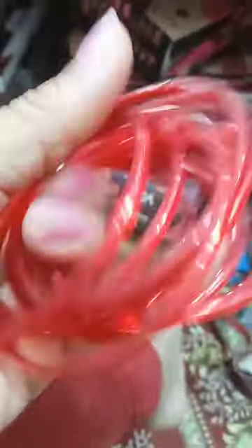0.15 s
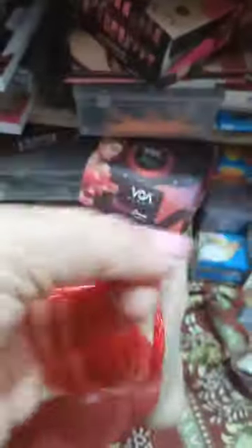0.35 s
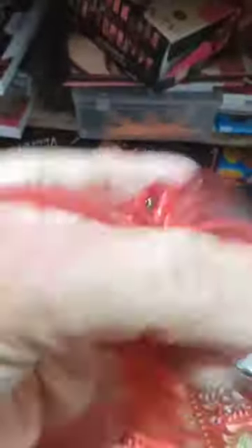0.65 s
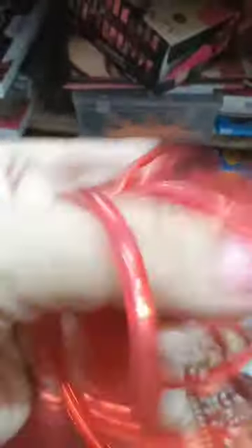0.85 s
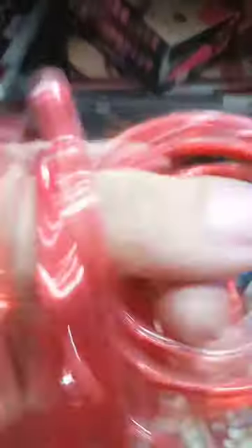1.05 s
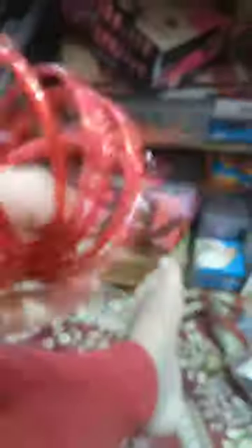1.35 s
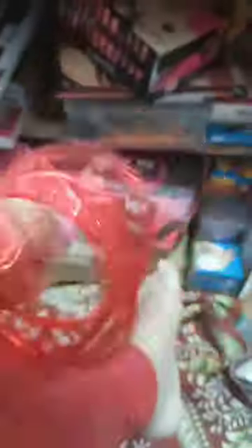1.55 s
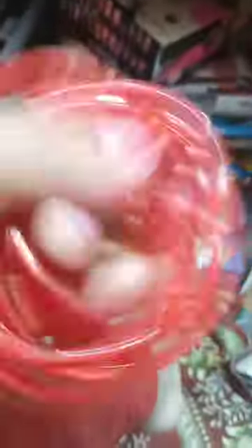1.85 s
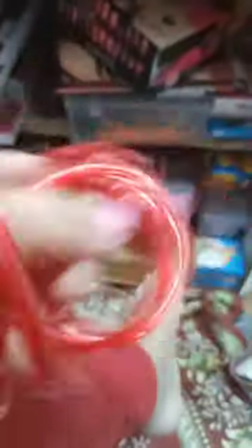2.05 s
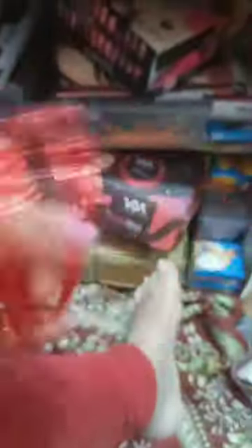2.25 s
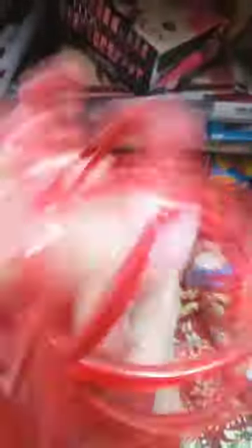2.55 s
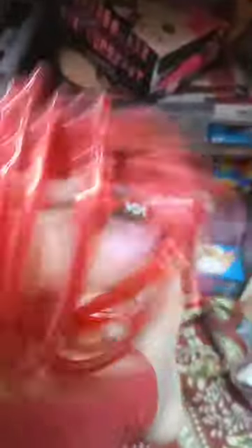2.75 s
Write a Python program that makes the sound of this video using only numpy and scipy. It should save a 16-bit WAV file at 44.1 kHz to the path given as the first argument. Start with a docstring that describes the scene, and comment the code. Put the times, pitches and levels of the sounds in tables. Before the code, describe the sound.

Glass bangles clink and jingle as a hand shakes them close by.

```python
"""A small room: a hand shakes a bunch of thin glass bangles, close by.
One bangle clinks alone, then the bunch slides and clashes in quick runs of tiny contacts.
Each contact ticks and rings a bangle's bending modes; now and then one swings free and sings.
The moving hand makes soft low thumps; behind it the room rumbles and hums faintly."""
import sys
import numpy as np
from scipy import signal
from scipy.fft import rfft, irfft
from scipy.io import wavfile
from scipy.ndimage import uniform_filter1d

SR = 44100
rng = np.random.default_rng(int(sys.argv[2]) if len(sys.argv) > 2 else 0)


def generate_wav(sig):
    """Save sig (samples, or channels by samples) to the path in sys.argv[1] as 16-bit PCM at SR."""
    pcm = np.round(np.clip(np.atleast_2d(sig).T, -1, 1) * 32767).astype(np.int16)
    wavfile.write(sys.argv[1], SR, pcm)


N = 127890
TIME_S = np.arange(N) / SR

# room rumble: f/Hz, relative density/dB
RUMBLE_SPECTRUM = [(25, -56), (70, -6), (150, -20), (220, -1), (350, -3), (510, 0), (690, -17), (900, -13),
                   (1200, -8.5), (1700, -10.5), (2500, -19.5), (3600, -24.5), (6500, -28.5), (9000, -51.5),
                   (15000, -79)]
# low-mid swells of the rumble: f/Hz, relative density/dB
SWELL_SPECTRUM = [(130, -23.5), (220, -5), (330, -1), (520, -3.5), (680, -17), (1500, -40)]
# trend of the swells: t/s, level/dB
SWELL_TREND = [(0, -56.5), (1.55, -55.5), (2.1, -51), (2.4, -58.5), (2.6, -52), (2.9, -55)]
# hand thumps: centre t/s, level/dB, half-width/s
HAND_THUMPS = [(0.09, -48.5, 0.04), (0.191, -41, 0.022), (0.264, -44.5, 0.038), (0.492, -43, 0.042),
               (0.564, -45.5, 0.023), (0.783, -45, 0.05), (1.109, -40, 0.022), (1.296, -48, 0.018),
               (1.734, -53, 0.022), (2.35, -58.5, 0.023)]
# grip rumble until the hand settles: t/s, level/dB
GRIP_LEVEL = [(0, -79), (.7, -58.5), (1.5, -62.5), (2.2, -66.5), (2.5, -89)]
# thumps and grip: f/Hz, relative density/dB
HAND_SPECTRUM = [(25, -31), (55, -6.5), (115, 1), (190, -6.5), (300, -11.5), (700, -68)]
# dull knocks of glass on skin: t/s, level/dB
SKIN_KNOCKS = [(0.4186, -38), (1.287, -48), (1.724, -48.5)]
# glass on skin: f/Hz, relative density/dB
SKIN_SPECTRUM = [(80, -27), (400, 8), (800, -3.5), (2000, -11.5), (4000, -12), (9000, -24)]
# lone clink, modes: f/Hz, relative level/dB, T60/s
LONE_MODES = [(1631, -15, .6), (4167, -14, .2), (4581, 1, .31), (5950, -4, .09), (6562, -10, .1),
              (8050, -7, .15), (8710, 0, .18), (12990, -2, .12)]
# lone clink, tick: f/Hz, relative density/dB
LONE_TICK_SPECTRUM = [(500, -11), (2000, -12), (2600, -2), (3500, -4.5), (5000, -1), (15000, -9.5)]
# partials of free-swinging bangles: t/s, f/Hz, level/dB
FREE_PARTIALS = [(0.571, 9700, -59.5), (.788, 8160, -40), (0.794, 5720, -43), (.883, 8040, -50.5),
                 (.977, 5650, -42), (1.004, 7580, -41.5), (1.075, 5740, -46), (1.213, 7570, -46),
                 (1.224, 11714, -40), (1.24, 7450, -51), (1.28, 5124, -42), (1.464, 5095, -34),
                 (1.575, 7560, -46), (1.685, 9580, -37.5), (2.041, 5770, -46), (2.112, 5840, -50),
                 (2.152, 4340, -43.5), (2.424, 5540, -44), (2.461, 5038, -41), (2.67, 5081, -48),
                 (2.71, 5650, -44)]
# bangles falling together: t/s, relative level/dB, run length/s, brightness/dB
BUNCH_CLASHES = [(0.311, -49, 0.015, -8), (0.352, -45, 0.069, 0), (0.398, -34.5, 0.0058, 0),
                 (0.43, -35, 0.019, 2), (0.451, -34, 0.0065, 3), (0.499, -44, 0.007, -4),
                 (0.612, -41.5, 0.0085, -7.5), (0.643, -51, 0.0033, -9), (0.684, -42.5, 0.017, -1),
                 (0.698, -29, 0.04, 1), (0.708, -29.5, 0.029, 5), (0.746, -29.5, 0.017, 3.5),
                 (0.786, -31.5, 0.024, 3), (0.804, -31, 0.003, -8), (0.826, -35, 0.011, 1),
                 (0.839, -31, 0.0061, 5), (0.913, -27.5, 0.02, 2.5), (0.938, -26.5, 0.022, 1.5),
                 (0.963, -35, 0.019, 4), (1, -36, 0.015, -1), (1.015, -22.5, 0.0024, 5),
                 (1.023, -27, 0.0023, 3), (1.038, -33, 0.044, 3), (1.055, -28.5, 0.0047, 14),
                 (1.083, -31, 0.04, 0), (1.106, -26, 0.0056, 5), (1.119, -27, 0.026, 2.5),
                 (1.149, -31, 0.041, 3.5), (1.171, -26.5, 0.0036, 16), (1.192, -37.5, 0.061, -3.5),
                 (1.223, -31, 0.0041, 5), (1.26, -30.5, 0.008, 10), (1.27, -28.5, 0.026, -4),
                 (1.284, -25, 0.023, 5), (1.329, -28.5, 0.019, 1.5), (1.354, -35.5, 0.025, -0.5),
                 (1.385, -29.5, 0.024, 0), (1.405, -28, 0.0029, 11), (1.419, -32, 0.017, -1.5),
                 (1.445, -30, 0.035, 2.5), (1.46, -30.5, 0.0047, 0), (1.488, -29, 0.012, -4.5),
                 (1.503, -27, 0.0045, 5), (1.5644, -26.5, 0.0028, 5), (1.574, -41, 0.039, -5),
                 (1.604, -32.5, 0.057, -7), (1.635, -26, 0.0079, 1.5), (1.648, -33, 0.025, 1.5),
                 (1.691, -29.5, 0.014, -0.5), (1.72, -31, 0.045, 5), (1.732, -24, 0.0051, 16),
                 (1.755, -26.5, 0.0069, 1.5), (1.825, -43, 0.007, -5), (1.869, -42, 0.035, 4),
                 (1.8926, -29, 0.019, -0.5), (1.92, -32, 0.0099, 3), (1.95, -29.5, 0.014, 0),
                 (1.9826, -29, 0.011, 3), (2.004, -32.5, 0.0056, 0.5), (2.04, -39.5, 0.022, -4),
                 (2.062, -34, 0.01, -1.5), (2.083, -43, 0.015, 10), (2.117, -37, 0.024, 1),
                 (2.1395, -29.5, 0.0087, 2), (2.152, -33, 0.015, -4), (2.171, -28, 0.021, 6),
                 (2.212, -35.5, 0.0066, -7.5), (2.247, -45, 0.013, 0), (2.28, -39.5, 0.011, -4.5),
                 (2.299, -44.5, 0.02, -4), (2.32, -28.5, 0.0035, 5), (2.33, -32.5, 0.03, -2),
                 (2.352, -30.5, 0.022, 2), (2.403, -46, 0.072, -3), (2.419, -33.5, 0.0039, 5),
                 (2.446, -41, 0.0045, -7), (2.462, -36, 0.013, -3), (2.489, -39, 0.029, -4),
                 (2.536, -36, 0.016, 1.5), (2.574, -38, 0.025, -3), (2.602, -43, 0.027, 4),
                 (2.642, -47.5, 0.034, -2), (2.665, -37, 0.02, 4), (2.707, -34.5, 0.0099, 6),
                 (2.718, -32.5, 0.0055, 0), (2.79, -45, 0.024, 3), (2.817, -40, 0.0033, 5),
                 (2.865, -49.5, 0.0068, -3)]
# modes of a bangle held in the bunch: f/Hz, relative level/dB
HELD_MODES = [(1792, -25.5), (4349, -18), (4470, -16.5), (4760, -15), (4945, -14), (5105, -9),
              (5556, -13.5), (5739, -14), (6720, -17), (7514, -18), (8290, -17), (8835, -13.5),
              (9242, -12.5), (9520, -9), (10590, -17), (11300, -11.5), (11640, -12), (13000, -14.5),
              (13750, -8), (14210, -9), (14830, -2.5), (15170, 0), (15560, 5.5)]
# dry tick of glass on glass: f/Hz, relative density/dB
TICK_SPECTRUM = [(500, -47), (1200, -12.5), (1800, -2), (2500, -7), (3600, -11.5), (4900, 4.5), (6300, -1),
                 (9400, -3), (10200, -1.5), (11600, 0.5), (12500, -11), (14000, 2), (15200, 5.5)]


def from_db(db):
    """Decibels to gain."""
    return 10 ** (np.asarray(db) / 20)


def unit_rms(x):
    """Scale to unit rms."""
    return x / np.sqrt(np.mean(x ** 2) + 1e-20)


def even_out(x, points):
    """Divide by the running rms, so no value towers over its neighbours."""
    return x / np.sqrt(uniform_filter1d(x ** 2, size=points))


def colour(x, spectrum):
    """Shape by a smooth spectrum, keeping the power of white noise."""
    hz, db = np.transpose(spectrum)
    grid_hz = np.maximum(np.arange(N // 2 + 1) * SR / N, 1)
    gain = from_db(np.interp(np.log(grid_hz), np.log(hz), db))
    return irfft(rfft(x) * unit_rms(gain), N)


def clicks(t_s, sizes):
    """Impulses of the given sizes at the given times."""
    return np.bincount(np.clip(np.asarray(t_s) * SR, 0, N).astype(int), sizes, N + 1)[:N]


def ring(force, hz, t60_s):
    """One damped mode: a unit click starts a sine of height 1."""
    r, w = from_db(-60 / (t60_s * SR)), 2 * np.pi * hz / SR
    return signal.lfilter([0, np.sin(w)], [1, -2 * r * np.cos(w), r * r], force + 1e-18)


def bursts(t_s, db, t60_s):
    """A fast-dying puff of noise at each time."""
    decay = from_db(-120 / (t60_s * SR))
    power = signal.lfilter([1], [1, -decay], clicks(t_s, from_db(db) ** 2) + 1e-18)
    return np.sqrt(power) * rng.standard_normal(N)


def room_tone(rumble_db=-54, hum_hz=202.3, hum_rms_db=-61, swells_per_s=19):
    """Steady rumble, uneven low-mid swells and a faint hum."""
    rumble = from_db(rumble_db) * colour(rng.standard_normal(N), RUMBLE_SPECTRUM)
    waver_db = 7.5 * np.interp(TIME_S * swells_per_s, np.arange(200), rng.uniform(-1.7, 1.7, 200))
    waver = even_out(from_db(waver_db), SR // 4)
    trend = from_db(np.interp(TIME_S, *np.transpose(SWELL_TREND)))
    swells = waver * trend * colour(rng.standard_normal(N), SWELL_SPECTRUM)
    hum = from_db(hum_rms_db) * np.sqrt(2) * np.sin(2 * np.pi * hum_hz * TIME_S)
    return rumble + swells + hum


def room_tail(x, t60_s=0.22, level_db=-12, gap_s=0.003):
    """Short diffuse reflections of a cluttered room."""
    t_s = TIME_S[:SR // 2]
    tail = rng.standard_normal(len(t_s)) * from_db(-60 * t_s / t60_s) * (t_s > gap_s)
    return from_db(level_db) * signal.fftconvolve(x, tail / np.sqrt(np.sum(tail ** 2)))[:N]


def hand():
    """The moving hand thumps, its grip rumbles, and glass knocks dully on skin."""
    thumps = sum(from_db(db) * np.exp(-((TIME_S - t_s) / width_s) ** 2)
                 for t_s, db, width_s in HAND_THUMPS)
    grip = from_db(np.interp(TIME_S, *np.transpose(GRIP_LEVEL)))
    motion = np.hypot(thumps, grip) * colour(rng.standard_normal(N), HAND_SPECTRUM)
    knocks = bursts(*np.transpose(SKIN_KNOCKS), t60_s=0.047)
    return motion + colour(knocks, SKIN_SPECTRUM)


def lone_clink(t_s=0.2022, level_db=-44.5):
    """One bangle struck once: ringing modes and a tick."""
    modes = sum(ring(clicks([t_s], [from_db(level_db + db)]), hz, t60_s) for hz, db, t60_s in LONE_MODES)
    tick = bursts([t_s], db=[-34], t60_s=0.024)
    return modes + colour(tick, LONE_TICK_SPECTRUM)


def free_bangles(t60_s=0.1):
    """A bangle that swings free sings with one partial."""
    return sum(ring(clicks([t_s], [from_db(db)]), hz, t60_s) for t_s, hz, db in FREE_PARTIALS)


def contacts(slots=4000, rate_per_s=750, spread_db=3.5, flight_s=0.005, flight_db=-0.5):
    """Each clash is a knock and a fading run of contacts. Returns t/s, level/dB, brightness/dB."""
    start_s, db, length_s, bright_db = np.transpose(BUNCH_CLASHES)
    run_s = (np.arange(slots) + rng.random(slots)) / rate_per_s
    age_s = run_s - start_s[:, None]
    fade = (age_s >= 0) * np.exp(-np.minimum((age_s / length_s[:, None]) ** 2, 50))
    power = from_db(db[:, None]) ** 2 * fade + 1e-16
    push = even_out(from_db(spread_db * rng.standard_normal(slots)), 5)  # shared by neighbours
    parted = ((age_s < 0) & (age_s > -flight_s)).any(0)  # bangles part just before a knock
    knock_db = db - 1
    run_db = 10 * np.log10(power.sum(0) * push ** 2) - 4 + flight_db * parted
    run_bright_db = bright_db @ power / power.sum(0)
    return np.r_[start_s, run_s], np.r_[knock_db, run_db], np.r_[bright_db, run_bright_db]


def tilt_db(bright_db, hz, corner_hz=4420):
    """Hard contacts favour the high modes, soft ones the low."""
    return bright_db * (np.clip(np.log(hz / corner_hz) / np.log(3), 0, 1) - 0.8)


def contact_ticks(t_s, db, bright_db, t60_s=0.011, split_hz=9000, gain_db=-4):
    """Glass on glass: a dry tick per contact, its two bands weighted by hardness."""
    ticks = np.zeros(N)
    for side, band_hz in ("low", 5500), ("high", 15300):
        puffs = bursts(t_s, db + tilt_db(bright_db, band_hz), t60_s)
        ticks += signal.sosfilt(signal.butter(2, split_hz, side, fs=SR, output="sos"), puffs)
    return from_db(gain_db) * colour(ticks, TICK_SPECTRUM)


def bunch_chime(t_s, db, bright_db, bangles=5, size_spread=0.011, gain_db=-8,
                shifts_per_s=30, shift_db=8.5, travel_s=0.002):
    """Each contact rings one of several bangles, detuned by their slightly different sizes."""
    count = len(t_s)
    struck = rng.integers(0, bangles, count)
    is_knock = np.arange(count) < len(BUNCH_CLASHES)
    chime = np.zeros(N)
    for hz, mode_db in HELD_MODES:
        t60_s = 0.078 * (4630 / hz) ** 0.8  # higher modes die sooner
        scatter = from_db(4 * rng.uniform(-2.7, 1.9, count))
        scatter = even_out(scatter * rng.choice([-1, 1], count), 6)
        # touching points wander: light contacts favour shifting modes, a knock wakes all
        point_db = shift_db * rng.uniform(-1.7, 1.7, (400, bangles))
        point = (t_s * shifts_per_s + rng.random()).astype(int) % len(point_db)
        coupling = np.where(is_knock, 1, unit_rms(from_db(point_db[point, struck])))
        force = scatter * coupling * from_db(db + mode_db + gain_db + tilt_db(bright_db, hz))
        offsets = np.linspace(-1, 1, bangles) + rng.uniform(-1, 1, bangles) / bangles
        detune = size_spread * rng.permutation(offsets)
        onset_s = t_s + travel_s * rng.random(count)  # bending waves run round the ring
        for k in range(bangles):
            chime += ring(clicks(onset_s[struck == k], force[struck == k]), hz * (1 + detune[k]), t60_s)
    return chime


def scene():
    """Glass with its reflections, the hand and the room tone; mono."""
    hits = contacts()
    glass = bunch_chime(*hits) + contact_ticks(*hits) + lone_clink() + free_bangles()
    return (glass + room_tail(glass) + hand() + room_tone())[None]


def record(dry):
    """Steep low-pass on the top treble."""
    cutoff_hz = 15760
    return signal.sosfilt(signal.ellip(12, 0.3, 75, cutoff_hz, fs=SR, output="sos"), dry)


dry = scene()
out = record(dry)
generate_wav(out)
```